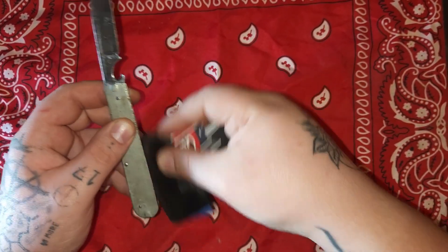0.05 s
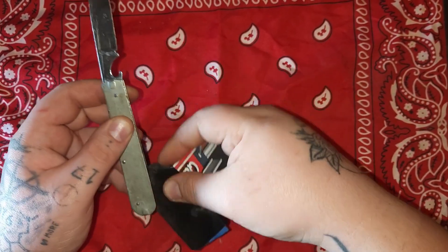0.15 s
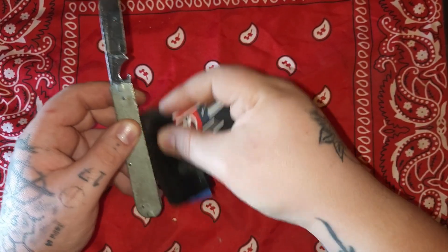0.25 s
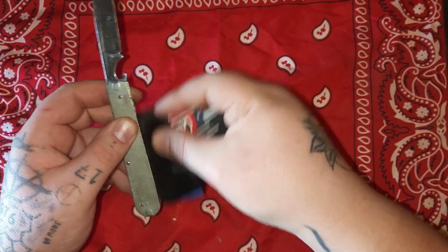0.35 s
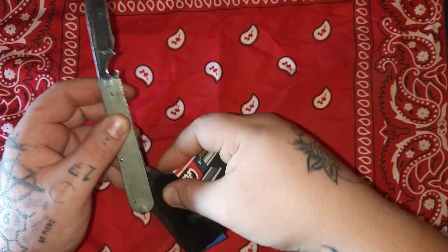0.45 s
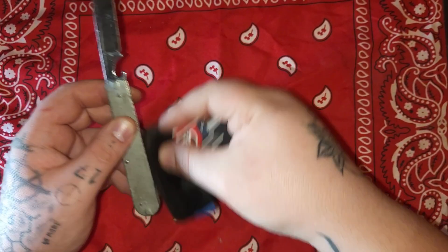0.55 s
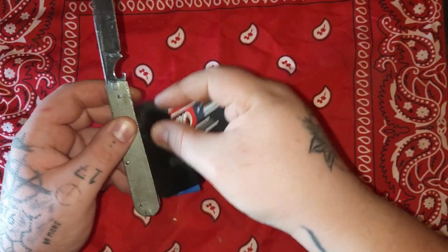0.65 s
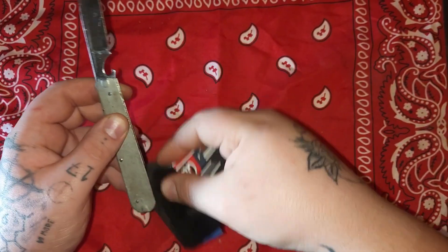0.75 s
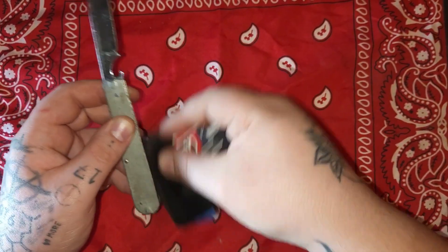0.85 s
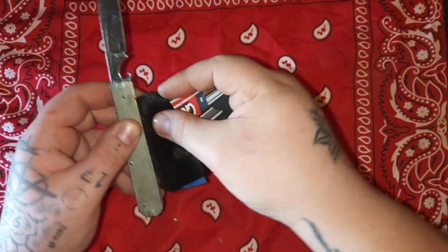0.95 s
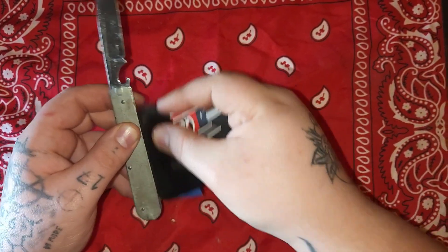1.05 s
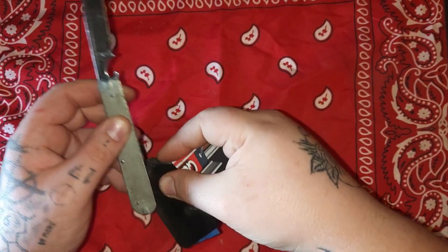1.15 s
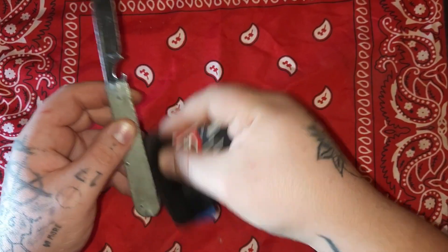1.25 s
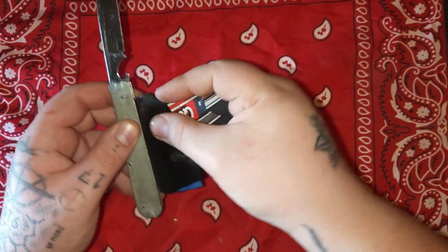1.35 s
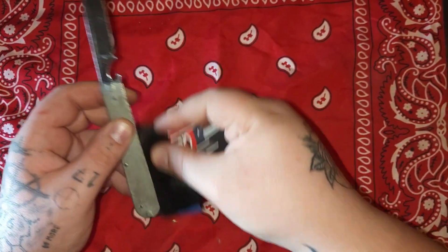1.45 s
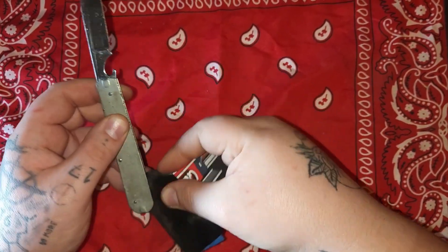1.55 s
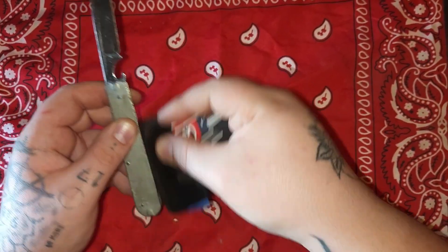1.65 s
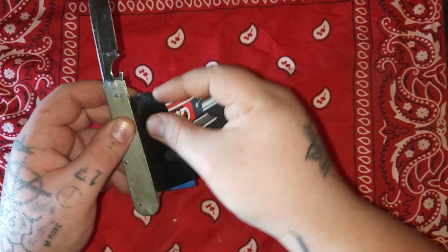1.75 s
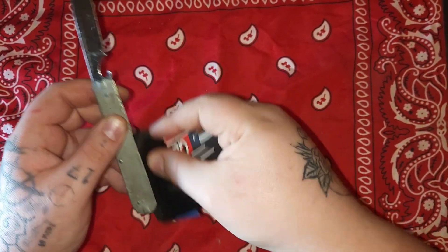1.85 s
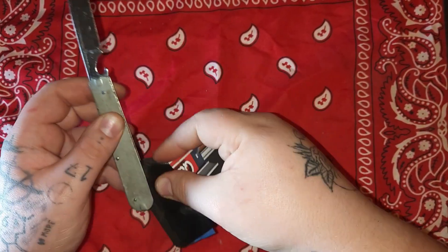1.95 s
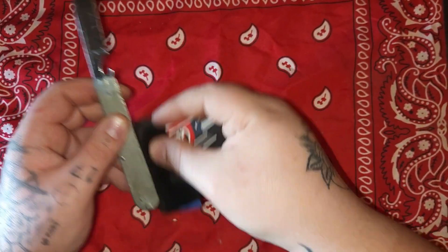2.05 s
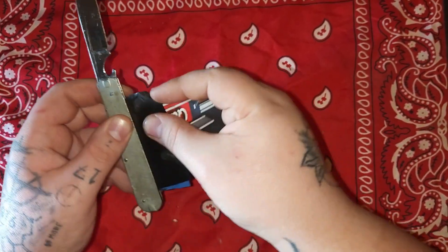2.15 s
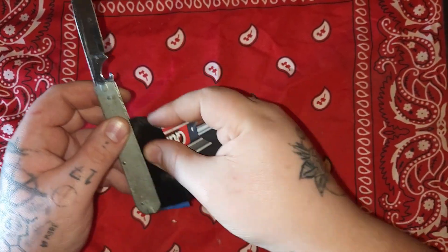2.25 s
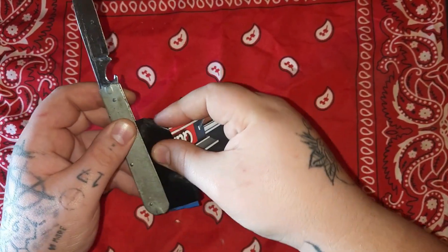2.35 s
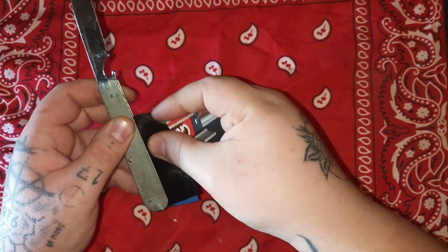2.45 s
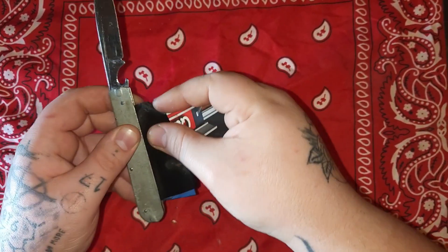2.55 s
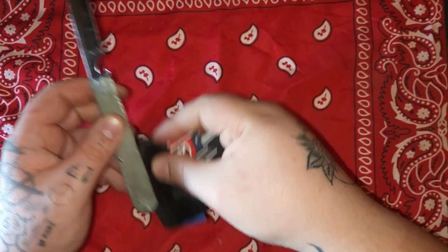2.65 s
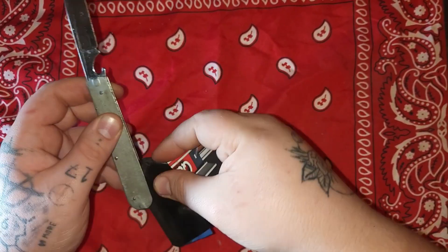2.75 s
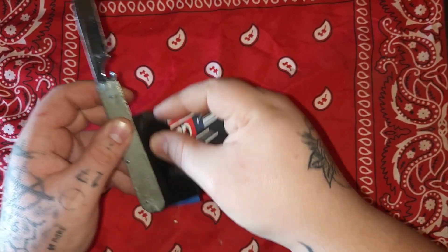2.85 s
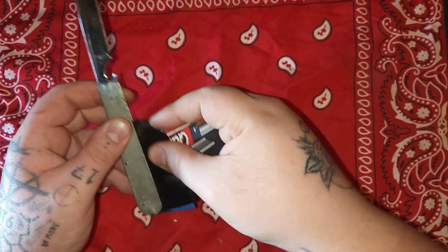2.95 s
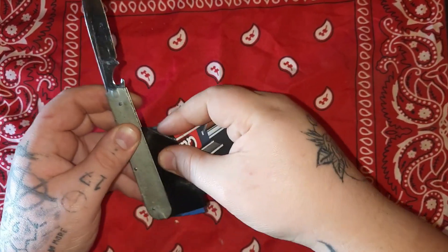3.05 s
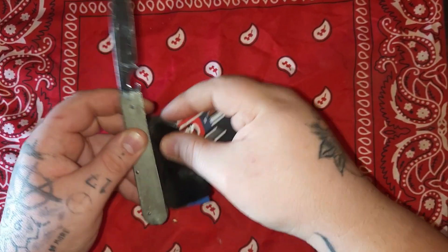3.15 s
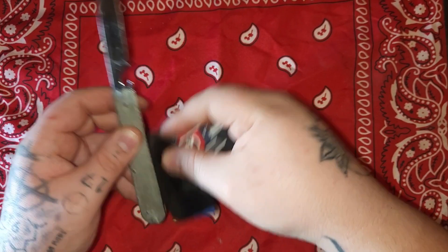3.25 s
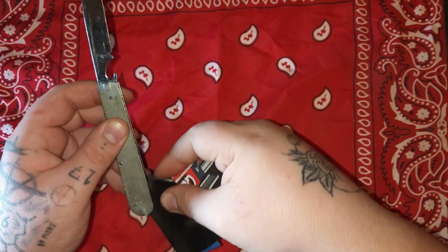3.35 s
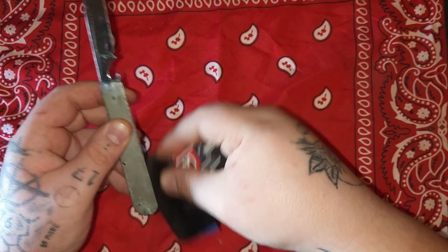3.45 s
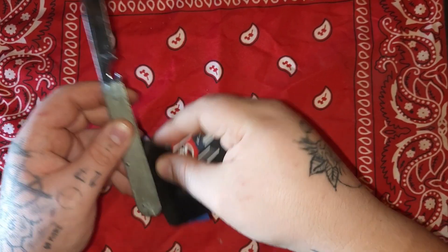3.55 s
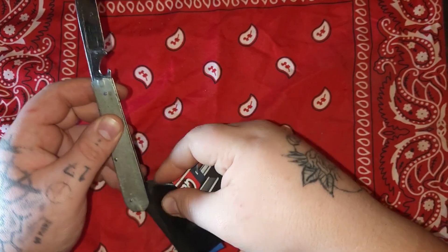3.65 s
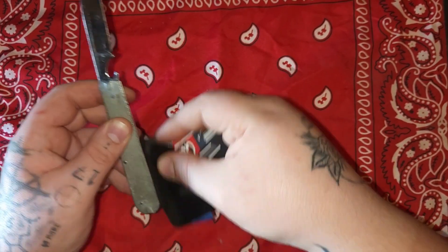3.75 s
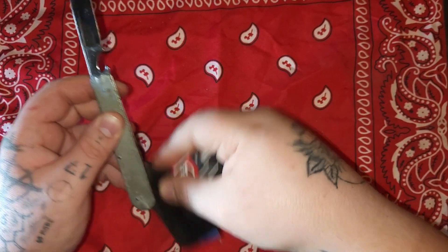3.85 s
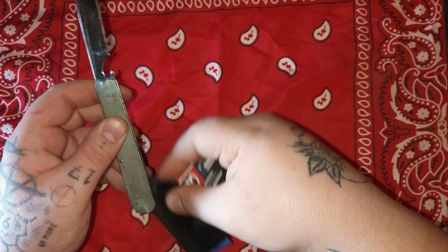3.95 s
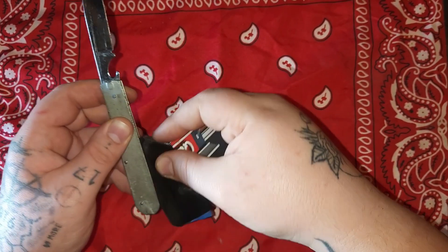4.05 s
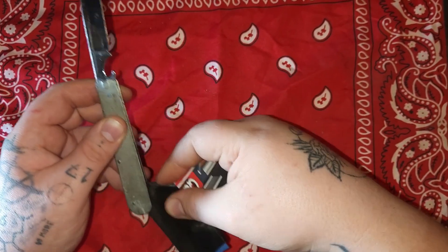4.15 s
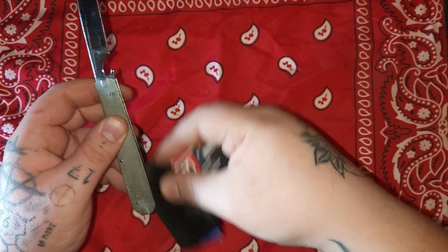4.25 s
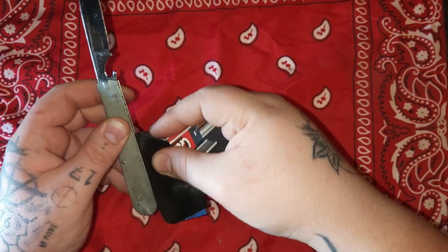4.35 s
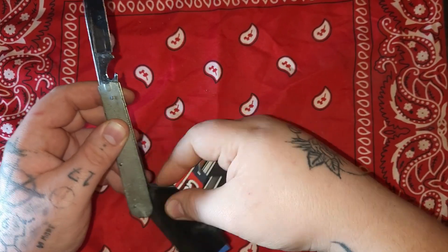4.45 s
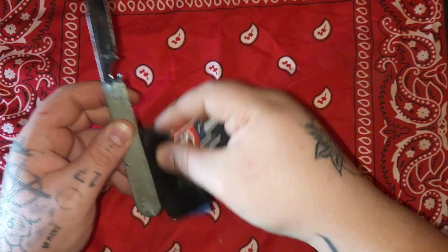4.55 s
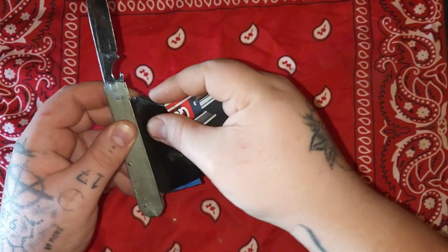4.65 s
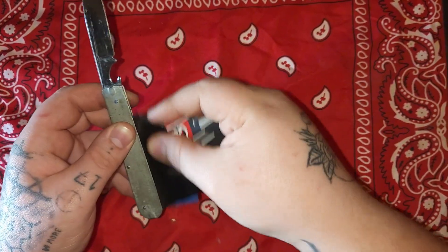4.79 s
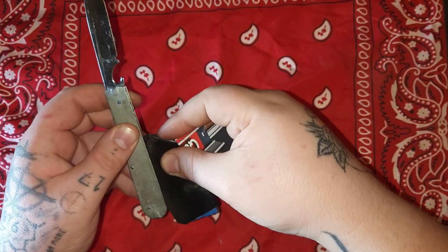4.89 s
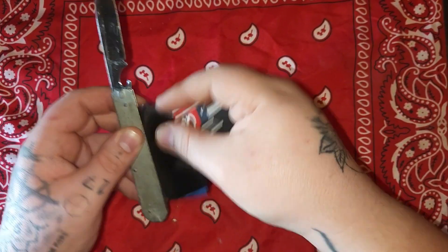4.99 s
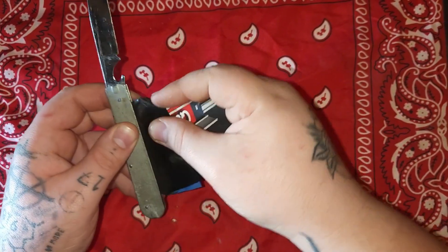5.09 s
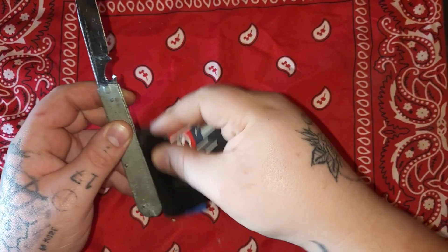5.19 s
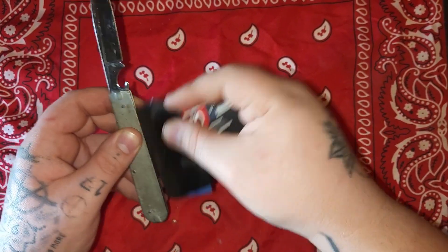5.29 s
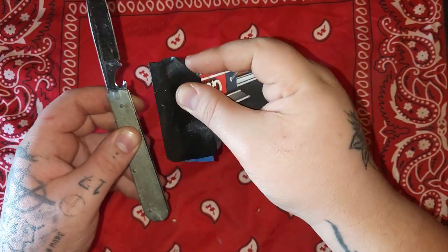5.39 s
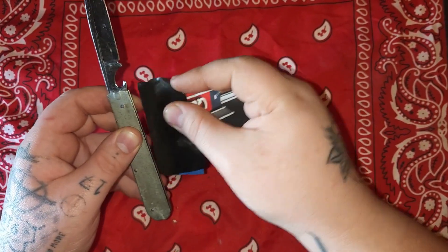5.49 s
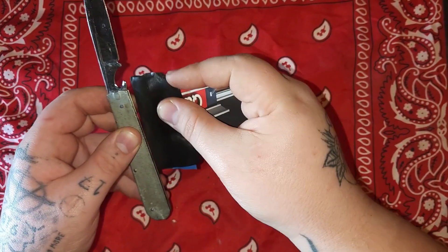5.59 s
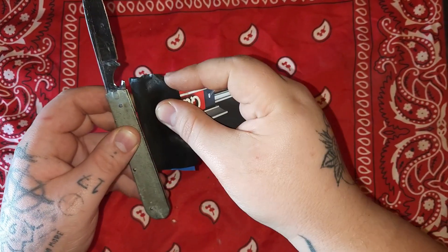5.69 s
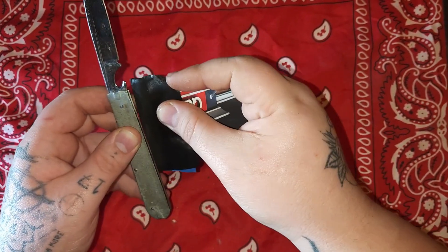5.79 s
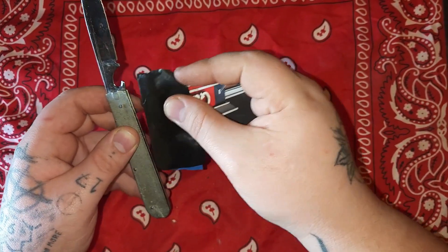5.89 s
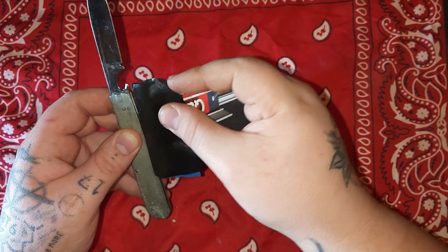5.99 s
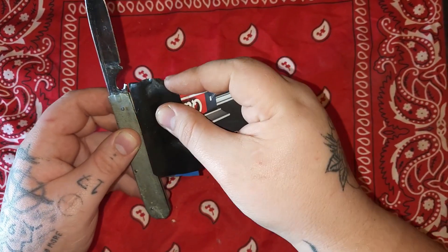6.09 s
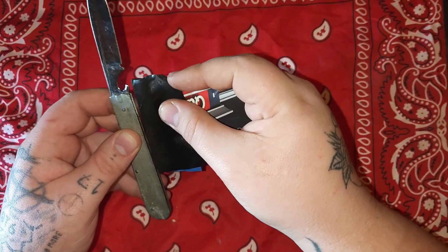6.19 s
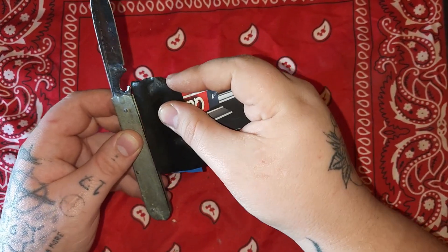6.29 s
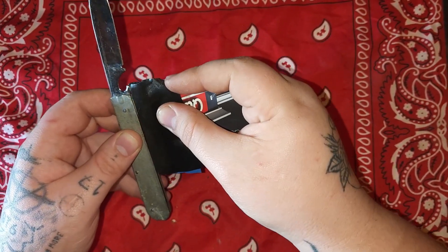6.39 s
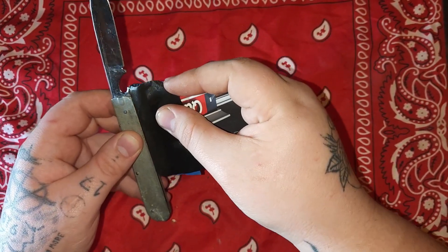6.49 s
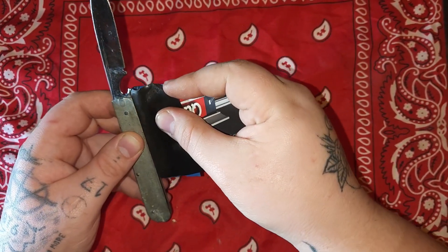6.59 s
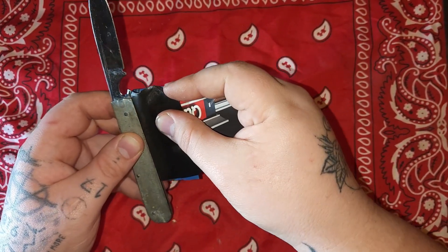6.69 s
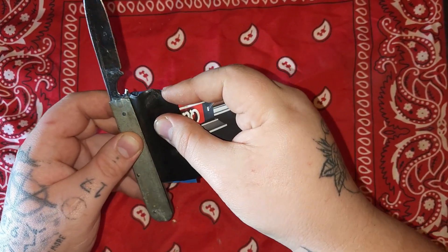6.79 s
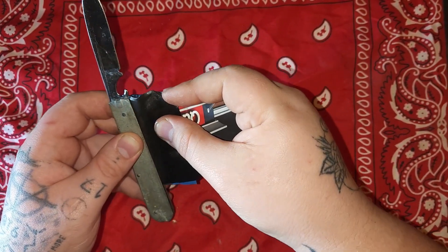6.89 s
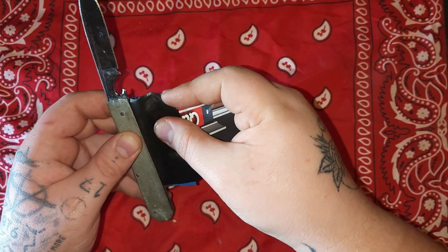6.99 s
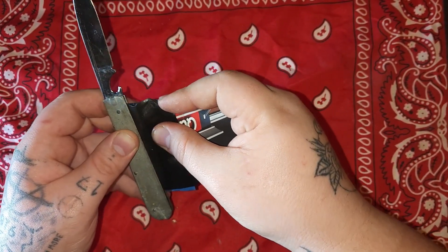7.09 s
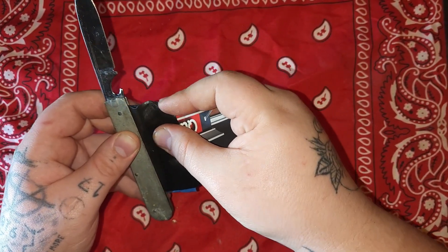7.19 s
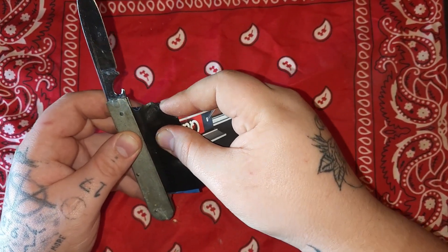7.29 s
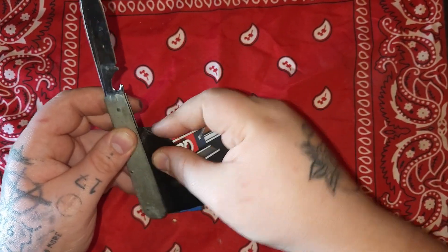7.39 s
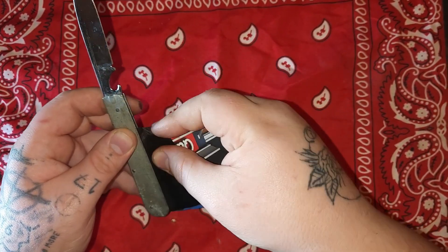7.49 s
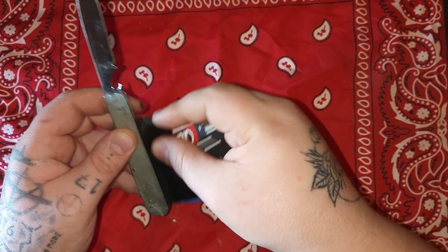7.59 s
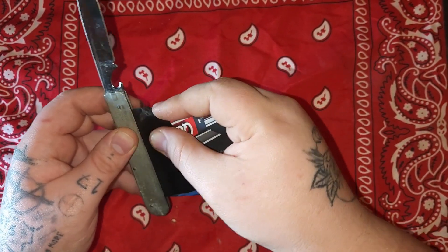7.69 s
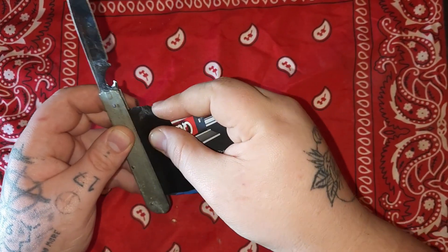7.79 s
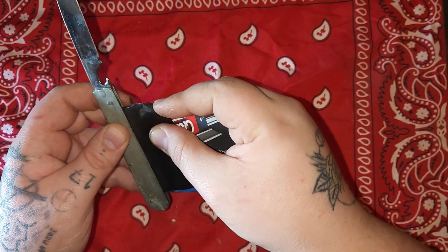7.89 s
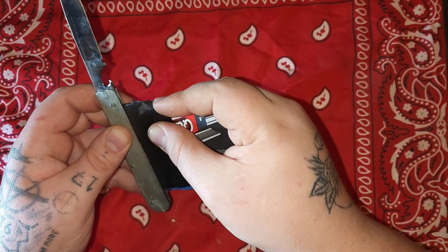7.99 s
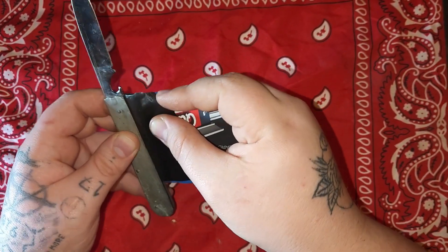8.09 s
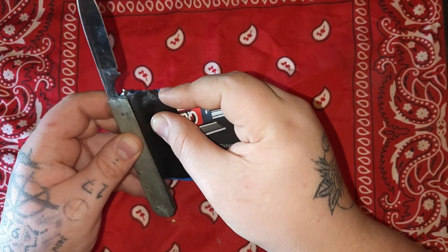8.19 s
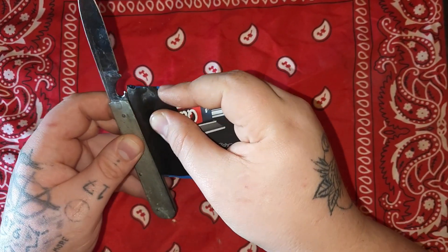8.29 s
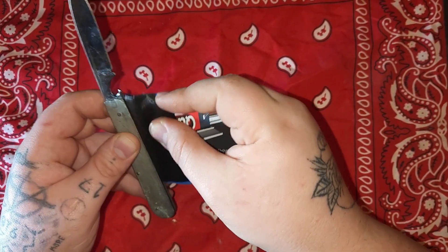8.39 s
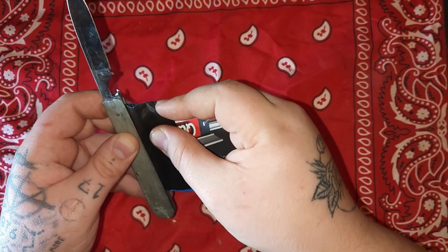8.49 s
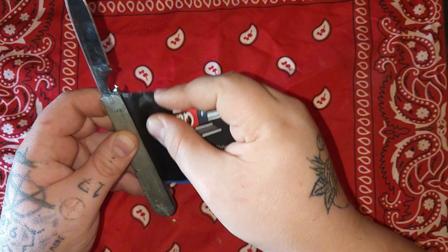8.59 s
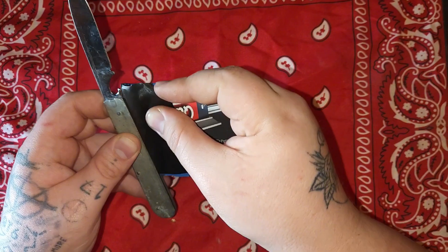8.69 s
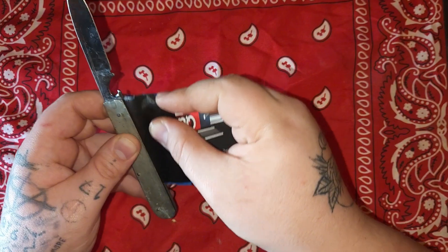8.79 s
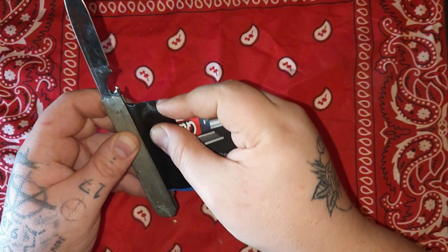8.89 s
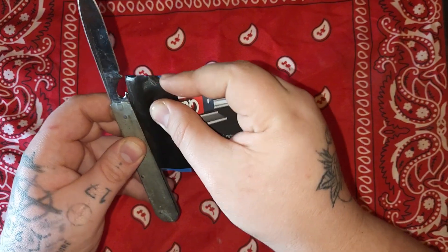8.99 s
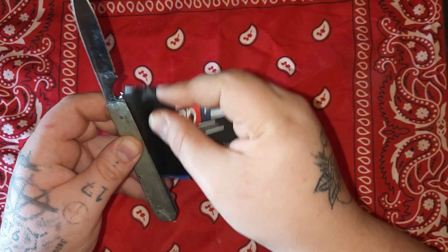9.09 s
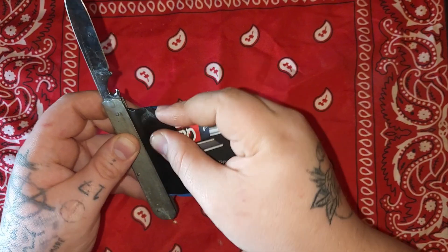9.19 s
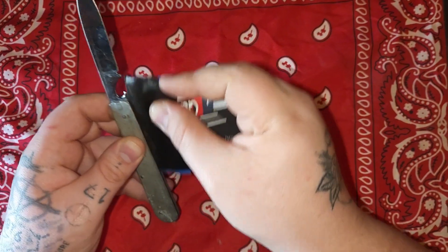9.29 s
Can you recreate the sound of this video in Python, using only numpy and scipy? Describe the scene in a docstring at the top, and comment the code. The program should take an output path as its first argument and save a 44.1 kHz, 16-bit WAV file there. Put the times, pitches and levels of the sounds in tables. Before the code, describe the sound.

Sandpaper folded around a plastic card rasps along a metal pocketknife in quick, gritty strokes, about six a second, with light knocks from the hands. A little past halfway the sanding eases into faint scratches and a few sharp clicks while a low hum swells and fades. Short, uneven strokes then return and grow steadier. It is all close to the microphone in a small room.

```python
"""Sandpaper folded round a plastic card rubs a pocketknife in quick strokes, close to the microphone.
It runs along the handle, feels slowly over the tang, then works in short strokes at the pivot.
Grit catches on the steel and drives the resonances of card and knife; the card's edge clicks,
hands knock and fingers rustle. A low hum swells and fades in the small room."""
import sys
import numpy as np
from scipy import signal
from scipy.fft import rfft, irfft
from scipy.io import wavfile
from scipy.ndimage import uniform_filter1d, minimum_filter1d

SR = 44100
rng = np.random.default_rng(int(sys.argv[2]) if len(sys.argv) > 2 else 0)


def waveform_to_disk(signal):
    """Save audio, clipped to [-1, 1], as 16-bit WAV at the path in sys.argv[1]."""
    frames = np.transpose(np.atleast_2d(signal))
    scaled = np.clip(frames, -1, 1) * 32767
    samples = np.round(scaled).astype(np.int16)
    wavfile.write(sys.argv[1], SR, samples)


N = 411894
TIME = np.arange(N) / SR


def amp(db):
    """Decibels to gain."""
    return 10 ** (np.asarray(db) / 20)


def unit_rms(x):
    """Scales to rms 1."""
    return x / np.sqrt(np.mean(x ** 2) + 1e-20)


def at_hz(table, hz):
    """Reads a table on a log-frequency axis."""
    f, value = np.transpose(table)
    return np.interp(np.log(hz + 1), np.log(f + 1), value)


def lookup(table, x):
    """Interpolates the other columns at x in the first."""
    axis, *columns = np.transpose(table)
    return [np.interp(x, axis, column) for column in columns]


def envelope(table):
    """Gain per sample from (time [s], level [dB])."""
    return amp(np.interp(TIME, *np.transpose(table)))


def add(mix, start_s, sound):
    """Mixes in a stereo sound."""
    at = round(start_s * SR)
    sound = sound[:, max(-at, 0):]
    part = mix[:, max(at, 0):][:, :sound.shape[1]]
    part += sound[:, :part.shape[1]]


def wander(size, rate_hz):
    """Low-passed noise, rms 1."""
    hz = np.fft.rfftfreq(size, 1 / SR)
    return unit_rms(irfft(rfft(rng.standard_normal(size)) / (1 + (hz / rate_hz) ** 4), size))


def peaks_db(modes, hz):
    """Lift from a set of resonances."""
    return sum(db / (1 + (2 * (hz - f) / width) ** 2) for f, width, db in modes)


# likeness of the microphone ports: (frequency [Hz], correlation)
PORT_CORRELATION = [(60, .99), (200, .9), (350, .86), (700, .96), (1600, .98), (2200, .68), (3600, .85),
                    (5500, .62), (7000, .47), (8500, .45), (9500, .15), (15000, -.12)]
def ports(drive, hz, gain, side_db):
    """Filters two independent drives and blends them into the left and right port."""
    a, b = rfft(drive)
    correlation, tilt = np.clip(at_hz(PORT_CORRELATION, hz), -1, 1), amp(side_db)
    pair = np.array([tilt * a, correlation * a + np.sqrt(1 - correlation ** 2) * b])
    return irfft(pair * gain * np.sqrt(2 / (1 + tilt ** 2)), drive.shape[1])


def noise(spectrum, side_db=.5):
    """Steady coloured stereo noise, rms 1."""
    hz = np.fft.rfftfreq(N, 1 / SR)
    return unit_rms(ports(rng.standard_normal((2, N)), hz, amp(at_hz(spectrum, hz)), side_db))


def tone(hz, waver_hz=1.3, flutter_db=1.5):
    """Wavering sine, rms 1."""
    cycles = np.cumsum(hz + waver_hz * wander(N, 4)) / SR
    return unit_rms(np.sin(2 * np.pi * cycles) * amp(flutter_db * wander(N, 6)))


# rumble spectrum, hum partials: (frequency [Hz], level [dB])
RUMBLE_SPECTRUM = [(15, -18), (28, -7), (42, 2), (60, -7), (80, -4), (110, -12), (170, -20), (250, -21),
                   (420, -35), (750, -30), (1100, -29), (2000, -40), (6000, -47), (15000, -53)]
HUM_PARTIALS = [(124.4, -3), (171, 0), (232.7, -17.5)]
# envelopes: (time [s], level [dB])
RUMBLE_LEVEL = [(0, -43.5), (3.1, -39.5), (4.1, -44), (5.5, -42), (6.3, -39.5), (7.1, -39), (7.8, -43),
                (9.34, -44)]
HUM_LEVEL = [(0, -52), (.6, -55), (1.2, -66), (4.4, -58), (5.2, -48), (5.8, -38), (6.3, -38), (6.8, -47),
             (7.4, -57), (9.34, -66)]
DRONE_LEVEL = [(0, -54), (5.5, -52), (6.3, -44), (8.1, -44), (8.8, -39), (9.34, -48)]
def background(drone_hz=78.5):
    """Room rumble, a hum that swells and fades, and a deeper drone that stays."""
    hum = sum(amp(db) * tone(hz) for hz, db in HUM_PARTIALS)
    rumble = noise(RUMBLE_SPECTRUM) * envelope(RUMBLE_LEVEL)
    return rumble + hum * envelope(HUM_LEVEL) + tone(drone_hz) * envelope(DRONE_LEVEL)


# reverberation: (frequency [Hz], T60 [s])
ROOM_DECAY = [(200, .3), (1500, .22), (6000, .215), (15000, .19)]
def room(x, gap_s=.006):
    """Sparse reflections of a small room; the treble dies first."""
    size = SR // 2
    taps = rng.standard_normal((2, size)) * (rng.random((2, size)) < .1)
    taps *= np.arange(size) / SR > gap_s
    hz, t, bands = signal.stft(taps, SR, nperseg=256)
    bands = bands * amp(-60 * t / at_hz(ROOM_DECAY, hz)[:, None])
    tail = signal.istft(bands, SR, nperseg=256)[1]
    tail /= np.linalg.norm(tail, axis=1, keepdims=True)
    return signal.fftconvolve(x, tail, axes=1)[:, :N]


# finger noise: (frequency [Hz], level [dB])
RUSTLE_SPECTRUM = [(100, -14), (220, -3), (350, 0), (450, -14), (900, -30)]
# its envelope: (time [s], level [dB])
RUSTLE_LEVEL = [(0, -58), (1.5, -61), (2.3, -57), (3.1, -66), (3.7, -60), (4.3, -56), (4.9, -58),
                (5.4, -72)]
def rustle():
    """Fingers shift on the knife."""
    return noise(RUSTLE_SPECTRUM) * envelope(RUSTLE_LEVEL)


# knocks: (time [s], level [dB], pitch [Hz])
KNOCKS = [(.357, -14, 1400), (1.037, -20, 1130), (1.301, -16, 1180), (1.415, -19, 1250), (1.77, -37, 330),
          (2.2, -14, 1170), (2.302, -34, 1100), (2.51, -32.5, 180), (4.13, -40, 300), (4.35, -39, 230),
          (4.432, -17, 1450), (4.71, -41, 350), (4.988, -24, 800), (6.149, -22, 1160), (6.266, -25.5, 700),
          (6.266, -35, 240), (6.323, -24, 660), (6.42, -27, 37)]
def knock(start_s, db, hz, decay_cycles=6.2, attack_share=.22, pitch_spread=.18):
    """Card and hands hit knife and bench; the hands damp each knock in the same number of cycles."""
    decay_s = decay_cycles / hz
    t = np.arange(SR // 2) / SR
    cycles = np.cumsum(hz * (1 + pitch_spread * wander(len(t), hz / 2))) / SR
    attack = 1 - np.exp(-t / (attack_share * decay_s))
    ring = np.sin(2 * np.pi * cycles) * np.exp(-t / decay_s) * attack
    return start_s, amp(db) * np.sqrt(2) * np.array([ring, ring])


# grit on steel: (frequency [Hz], level [dB])
RASP_SPECTRUM = [(250, -35), (420, -33), (650, -18.3), (1100, -11.4), (1800, -17.3), (2800, -9.8),
                 (4000, -5.6), (6000, -2), (8400, -2.2), (9300, -11), (10200, -9.1), (11300, -5.4),
                 (14000, -4.1), (16000, -7)]
# card and knife resonances by place rubbed: (frequency [Hz], width [Hz], lift [dB])
HANDLE_MODES = [(731, 110, 3.3), (1219, 189, 4.4), (1513, 314, 8.6), (2062, 544, 9.6), (4277, 600, 2.0),
                (5390, 743, 5.0), (7478, 555, 2.3), (8086, 512, 2.9)]
TANG_MODES = [(490, 210, 13.2), (741, 258, 14.0), (1320, 480, 9.5), (2212, 239, 10.8), (3225, 522, 5.6),
              (4640, 684, 5.0), (5416, 318, 6.6), (7352, 316, 2.1)]
PIVOT_MODES = [(696, 275, 5.6), (1244, 218, 6.3), (1514, 226, 7.2), (2140, 429, 4.8), (4327, 465, 2.6),
               (5544, 506, 3.8), (6237, 380, 4.5), (7310, 359, 5.0), (8000, 600, 2.5)]
def contact_colour(modes, body_db, fizz_db, hz):
    """Spectral gain of a rubbed place, and the low share of it that the card's body carries."""
    gain = amp(at_hz(RASP_SPECTRUM, hz) + peaks_db(modes, hz))
    main_band = (hz > 4000) & (hz < 8500)
    gain /= np.sqrt(np.mean(gain ** 2 * main_band))
    card_share = np.interp(hz, [1600, 3900], [1, 0])
    fizz_share = np.interp(hz, [8400, 9600], [0, 1])
    return gain * amp(body_db * card_share + fizz_db * fizz_share), card_share


# paper creeping or pressed in place: (start [s], end [s], level [dB], ticks [1/s])
CREEP_SPANS = [(2.23, 2.46, -52, 40), (2.93, 2.99, -42, 80), (5.5, 5.68, -45, 35), (6.42, 6.76, -39, 35),
               (7.08, 7.14, -41, 70), (7.2, 7.31, -33, 65), (7.44, 7.54, -46, 50)]
def grain_ticks(spread_db=3, body_db=-3):
    """Single grains let go at random; returns click rows."""
    return [(s, db + spread_db * rng.standard_normal(), body_db)
            for start, end, db, per_s in CREEP_SPANS
            for s in rng.uniform(start, end, round((end - start) * per_s))]


# snaps of the card's edge: (time [s], level [dB], card body [dB])
EDGE_CLICKS = [(1.04, -35, 8), (1.717, -21, -5), (2.227, -27, 3), (2.399, -32.5, -4), (2.907, -17, -6),
               (2.937, -25, 2), (4.65, -29, -6), (5.518, -34, 8), (5.861, -14.5, 1), (5.989, -36, 10),
               (6.265, -20.5, 10), (6.71, -24.5, -6)]
def click(start_s, db, body_db, snap_s=.0013, rattle_s=.005, rattle_db=-17, span_s=.006):
    """The card's edge or a grain slips on the steel: a hard snap and a short rattle."""
    size, lead_s = 4096, .02
    t, hz = np.arange(size) / SR - lead_s, np.fft.rfftfreq(size, 1 / SR)
    decay = np.exp(-abs(t) / snap_s) + amp(rattle_db) * np.exp(-abs(t) / rattle_s)
    burst = rng.standard_normal((2, size)) * np.clip(t / .0008, 0, 1) * decay
    drive = unit_rms(burst) * np.sqrt(span_s * SR / size)  # energy of span_s at rms 1
    fizz_db = -4 - .4 * body_db
    gain, _ = contact_colour(TANG_MODES, body_db, fizz_db, hz)
    return start_s - lead_s, amp(db) * ports(drive, hz, gain, side_db=2.5)


def grit(size, coarseness, catches_per_s, grains_per_s=22000, catch_s=.0007):
    """Fine grains tick constantly; a large one catches and frees a burst of them."""
    grains = rng.standard_normal((2, size)) * (rng.random(size) < grains_per_s / SR)
    catches = rng.exponential(1, size) * (rng.random(size) < catches_per_s / SR)
    bursts = signal.lfilter([1], [1, -np.exp(-1 / (catch_s * SR))], catches)
    return unit_rms(grains) * np.sqrt(1 - coarseness + coarseness * bursts / bursts.mean())


# steel resonance at the spot rubbed: (time [s], frequency [Hz])
STEEL_RING = [(0, 6200), (6.4, 6700), (6.75, 4400), (7.6, 4600), (7.8, 6900), (9.3, 7100)]
def grip_rings(start_s, card_range_hz=(1100, 2700), steel_spread=.16, card_db=3.6, steel_db=3.2):
    """Card and steel ring differently with each grip; returns their two modes."""
    card_hz = rng.uniform(*card_range_hz)
    steel_hz = lookup(STEEL_RING, start_s)[0] * (1 + steel_spread * rng.uniform(-1, 1))
    return [(card_hz, 260, card_db), (steel_hz, 650, steel_db)]


# radiation to the ports: (frequency [Hz], left minus right [dB])
HANDLE_BALANCE = [(60, 0.0), (100, 0.0), (180, 0.0), (310, 1.5), (550, 3.0), (950, 3.0), (1650, 1.5),
                  (2860, 1.5), (4970, 3.0), (8640, 3.5), (15000, 3.0)]
PIVOT_BALANCE = [(60, 0.5), (100, 0.5), (180, 0.0), (310, 1.5), (550, 2.0), (950, 2.0), (1650, 1.0),
                 (2860, 2.0), (4970, 3.0), (8640, 3.5), (15000, 1.0)]
def place(start_s, tang_from_s=5.4, pivot_from_s=6.4):
    """Modes and stereo balance of the part being rubbed."""
    if start_s < tang_from_s:
        return HANDLE_MODES, HANDLE_BALANCE
    return (TANG_MODES if start_s < pivot_from_s else PIVOT_MODES), PIVOT_BALANCE


def bite_time(start_s, rise_s, below_db=9):
    """When the paper bites, below_db under the full push."""
    return start_s - rise_s * below_db / 20


def drags(strokes, max_gap_s=.085, relative_db=-25, rise_s=.02):
    """Between quick strokes the paper drags softly while the hand turns; returns stroke rows."""
    return [(end, next_start, db + relative_db, rise_s)
            for (_, end, db, _), (next_start, _, _, next_rise) in zip(strokes, strokes[1:])
            if bite_time(next_start, next_rise) - end < max_gap_s]


# a firm push hisses evenly, a light one is coarser with more body:
# (stroke level [dB], card body [dB], coarseness [0-1], fall [s/20 dB], catches [1/s])
PUSH_FEEL = [(-40, 7.5, .35, .026, 260), (-31, 6.5, .55, .03, 260), (-24, 5.5, .3, .03, 380),
             (-17, 3, .2, .021, 380), (-14.5, -1, .17, .018, 380), (-12.5, -3.5, .12, .024, 380)]
# tone as the grip changes: (time [s], card body [dB], fizz [dB])
GRIP_TONE = [(0, .4, -2), (1.2, -.3, -1.8), (2.1, .8, -.6), (2.5, 1.8, 1.2), (2.7, -.2, -1),
             (4.3, -.7, -.2), (4.95, 0, -1), (5.25, 0, -2.5), (5.55, -6, -1), (6.1, -4, -8),
             (6.32, .5, -10.5), (6.45, -.5, -3), (6.75, 0, -1), (7.35, 2.6, 0), (7.6, -.5, -2),
             (8, 1.2, -2), (8.3, -3.5, -3.6), (8.55, -1, -4.6), (9.3, -1, -2.4)]
# passes of the paper: (start [s], end [s], level [dB], rise [s/20 dB])
SANDING_STROKES = [(0.002, 0.108, -14.0, 0.006), (0.199, 0.279, -14.0, 0.068), (0.347, 0.444, -14.5, 0.074),
                   (0.504, 0.605, -14.0, 0.024), (0.667, 0.757, -14.0, 0.085), (0.809, 0.91, -15.0, 0.01),
                   (0.958, 0.987, -27.5, 0.037), (1.053, 1.137, -14.5, 0.014), (1.224, 1.299, -15.0, 0.006),
                   (1.337, 1.369, -24.0, 0.011), (1.416, 1.523, -14.0, 0.055), (1.591, 1.691, -14.0, 0.029),
                   (1.708, 1.787, -26.0, 0.006), (1.79, 1.902, -15.0, 0.043), (2.012, 2.099, -15.0, 0.023),
                   (2.141, 2.184, -27.0, 0.006), (2.189, 2.199, -13.0, 0.031), (2.201, 2.258, -35.5, 0.051),
                   (2.475, 2.493, -13.0, 0.031), (2.509, 2.592, -40.5, 0.006), (2.602, 2.685, -13.5, 0.028),
                   (2.783, 2.862, -14.5, 0.011), (2.9, 2.909, -17.0, 0.016), (3.114, 3.174, -14.5, 0.01),
                   (3.225, 3.316, -12.5, 0.022), (3.321, 3.348, -23.5, 0.006), (3.427, 3.495, -15.5, 0.006),
                   (3.545, 3.612, -13.5, 0.025), (3.7, 3.771, -14.0, 0.049), (3.809, 3.874, -13.5, 0.018),
                   (3.945, 4.021, -15.0, 0.023), (4.076, 4.134, -14.0, 0.02), (4.232, 4.307, -14.0, 0.041),
                   (4.38, 4.431, -13.5, 0.039), (4.477, 4.599, -13.5, 0.013), (4.622, 4.663, -35.0, 0.018),
                   (4.768, 4.844, -16.5, 0.065), (4.946, 4.986, -13.0, 0.011), (5.038, 5.121, -32.5, 0.006),
                   (5.149, 5.199, -13.5, 0.028), (5.236, 5.295, -13.5, 0.015), (5.515, 5.574, -33.5, 0.006),
                   (5.627, 5.662, -40.5, 0.006), (5.829, 5.869, -28.0, 0.057), (6.083, 6.139, -37.0, 0.023),
                   (6.132, 6.163, -21.0, 0.006), (6.321, 6.33, -25.5, 0.055), (6.435, 6.443, -36.5, 0.037),
                   (6.507, 6.758, -32.0, 0.006), (6.777, 6.809, -23.5, 0.05), (6.993, 7.037, -16.5, 0.087),
                   (7.228, 7.321, -32.0, 0.054), (7.338, 7.361, -11.5, 0.06), (7.571, 7.604, -16.0, 0.021),
                   (7.675, 7.705, -34.0, 0.006), (7.796, 7.834, -24.5, 0.13), (7.91, 7.925, -21.5, 0.049),
                   (8.001, 8.064, -18.5, 0.006), (8.143, 8.231, -21.5, 0.026), (8.25, 8.297, -38, 0.014),
                   (8.329, 8.369, -22.0, 0.013), (8.377, 8.416, -13.5, 0.061), (8.56, 8.615, -13.5, 0.006),
                   (8.639, 8.673, -41.5, 0.024), (8.767, 8.824, -14.5, 0.046), (8.907, 8.976, -14.5, 0.009),
                   (9.084, 9.14, -13.5, 0.076), (9.218, 9.284, -14.0, 0.01)]
def stroke(start_s, end_s, db, rise_s, attack_s=.009, arch_db=2.8,
           judder_db=1.2, chatter_db=1.7, ripple_db=1.5, trim_db=-.15, card_trim_db=-.65):
    """One pass of the paper: grit under the hand's push drives card and knife."""
    body_db, coarseness, fall_s, catches_per_s = lookup(PUSH_FEEL, db)
    grip_db, fizz_db = lookup(GRIP_TONE, start_s)
    modes, balance = place(start_s)
    size, lead_s = 18432, .1
    t, hz = start_s - lead_s + np.arange(size) / SR, np.fft.rfftfreq(size, 1 / SR)
    bite_s = bite_time(start_s, rise_s)
    attack_db = -20 * np.maximum(bite_s - t, 0) / attack_s
    swell_db = -20 * np.clip(start_s - t, 0, start_s - bite_s) / rise_s
    release_db = -20 * np.maximum(t - end_s, 0) / fall_s
    push_db = db + trim_db + attack_db + swell_db + release_db
    drive = grit(size, coarseness, catches_per_s) * amp(push_db + judder_db * wander(size, 70))
    # steel hisses most at full speed; the card follows speed less and chatters
    travel = np.interp(t, [start_s, max(end_s, start_s + .005)], [-1, 1])
    speed_db = -arch_db * (travel - .05) ** 2
    hiss = drive * amp(speed_db)
    flutter = unit_rms(amp(chatter_db * wander(size, 110)))
    chatter = drive * amp(speed_db / 2 + card_trim_db) * flutter
    gain, card_share = contact_colour(modes, body_db + grip_db, fizz_db, hz)
    gain *= amp(peaks_db(grip_rings(start_s), hz))
    side_db = at_hz(balance, hz)
    sound = np.zeros((2, size))
    for spot in -1, 0, 1:  # fine resonances change as the contact travels
        nearness = np.clip(1 - abs(travel - spot), 0, 1)
        spot_gain = gain * amp(ripple_db * wander(len(hz), 380))
        sound += ports(hiss * nearness, hz, spot_gain * (1 - card_share), side_db)
        sound += ports(chatter * nearness, hz, spot_gain * card_share, side_db)
    return start_s - lead_s, sound


def scene(room_db=-18.7):
    """Strokes, clicks and handling at the bench, in the room."""
    work = rustle()
    for source, rows in ((stroke, SANDING_STROKES + drags(SANDING_STROKES)),
                         (click, EDGE_CLICKS + grain_ticks()),
                         (knock, KNOCKS)):
        for row in rows:
            add(work, *source(*row))
    return work + amp(room_db) * room(work) + background()


def record(dry, ceiling=.97, cutoff_hz=15900):
    """Fast peak limiter, then a low-pass."""
    allowed = np.minimum(1, ceiling / (abs(dry).max(0) + 1e-9))
    gain = uniform_filter1d(minimum_filter1d(allowed, size=45), size=45)
    low_pass = signal.firwin(511, cutoff_hz, window=("kaiser", 8), fs=SR)
    return signal.oaconvolve(dry * gain, low_pass[None], "same", axes=1)


dry = scene()
out = record(dry)
waveform_to_disk(out)
```